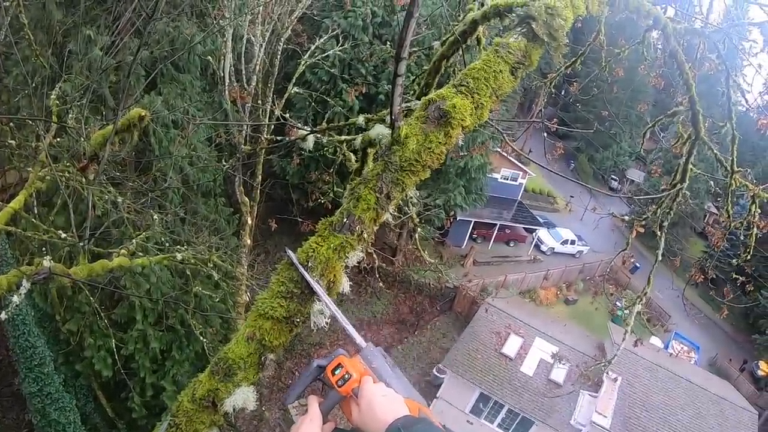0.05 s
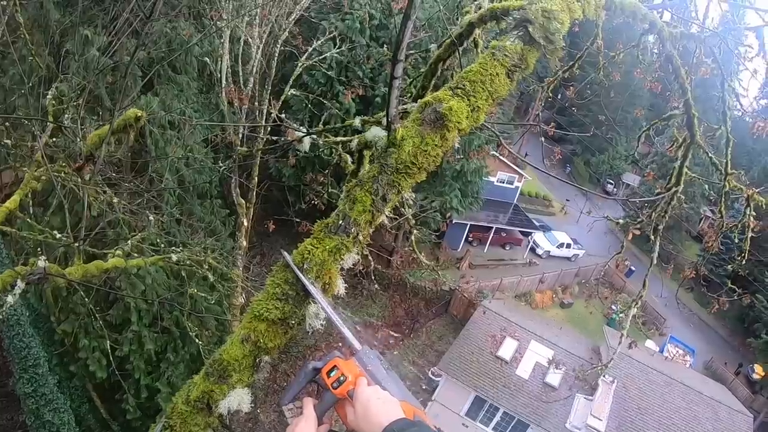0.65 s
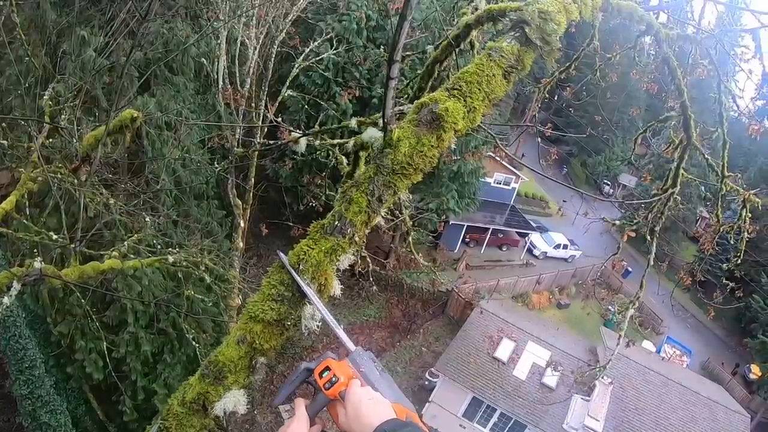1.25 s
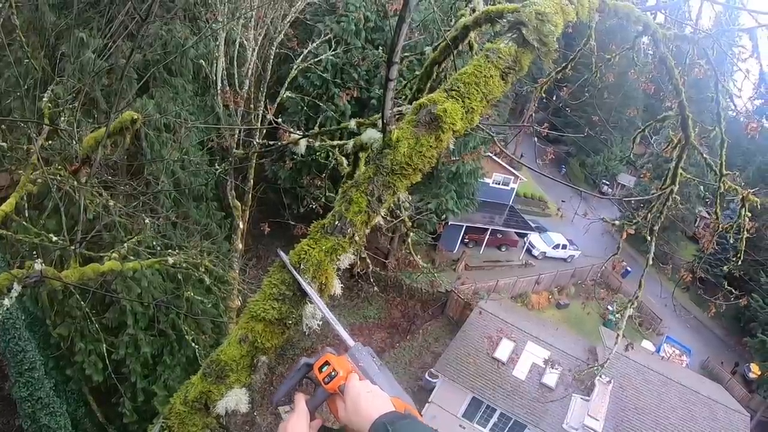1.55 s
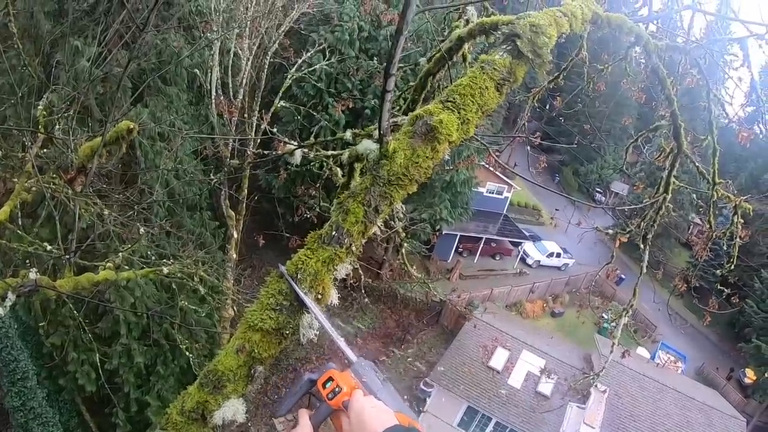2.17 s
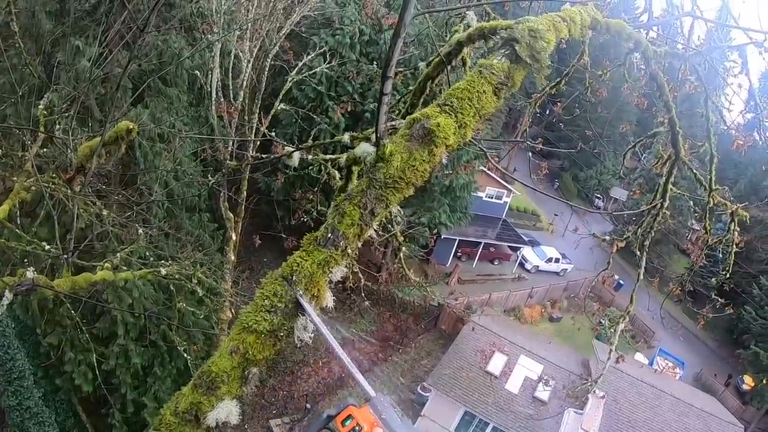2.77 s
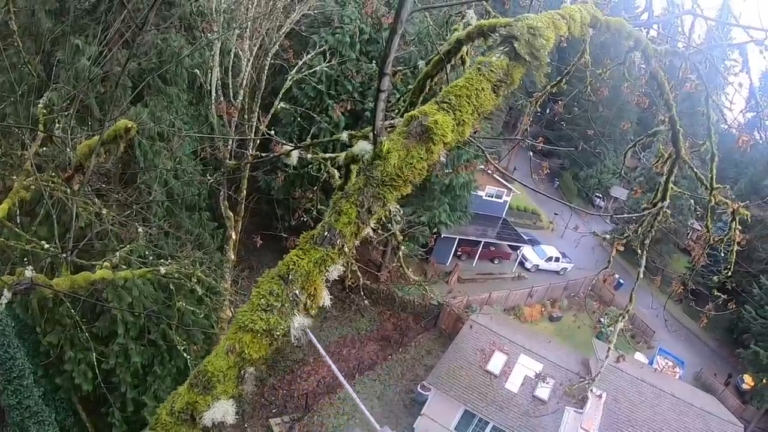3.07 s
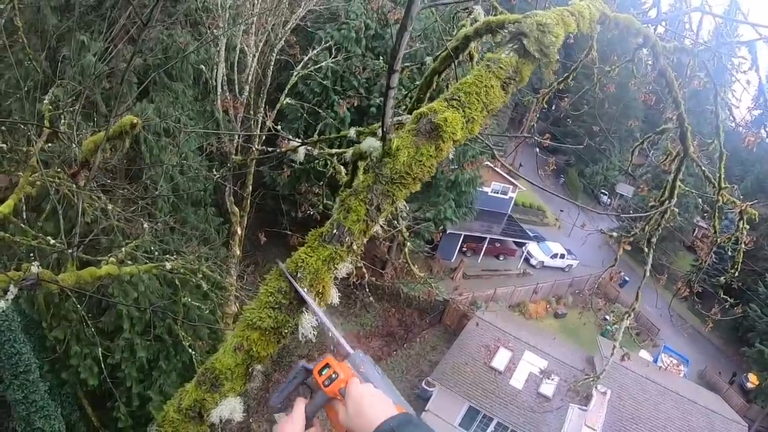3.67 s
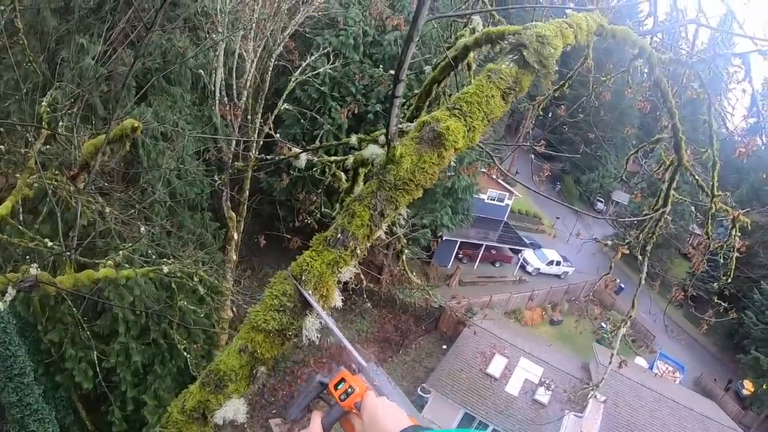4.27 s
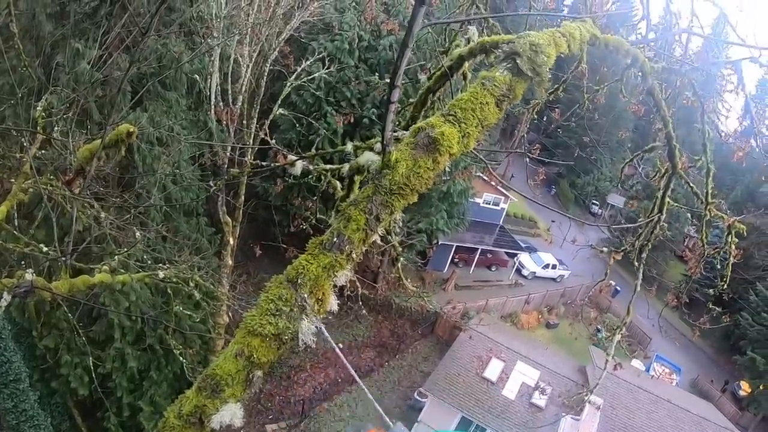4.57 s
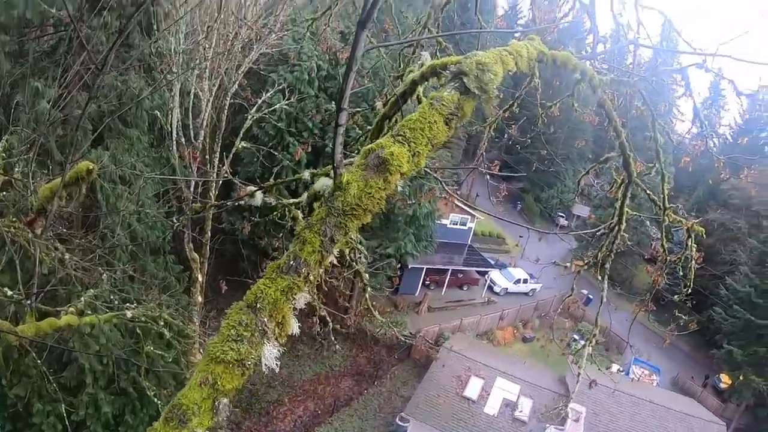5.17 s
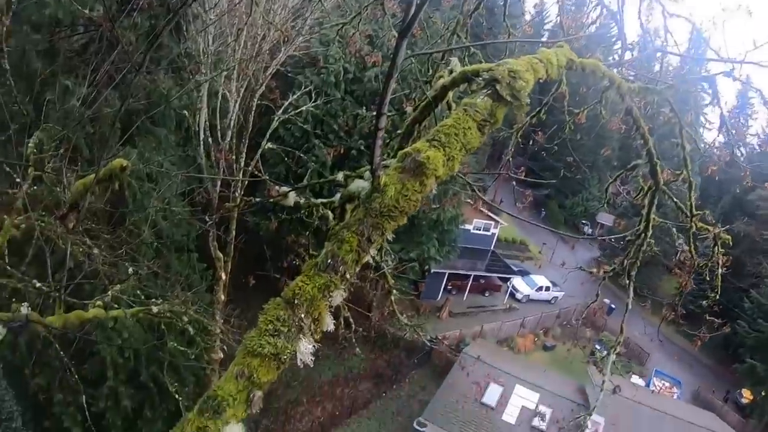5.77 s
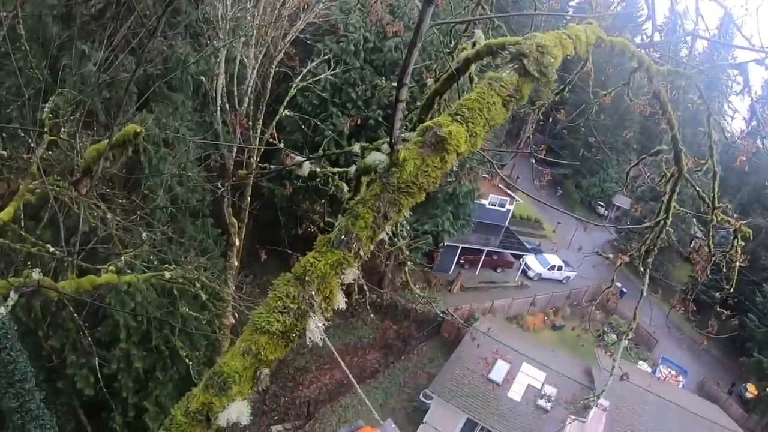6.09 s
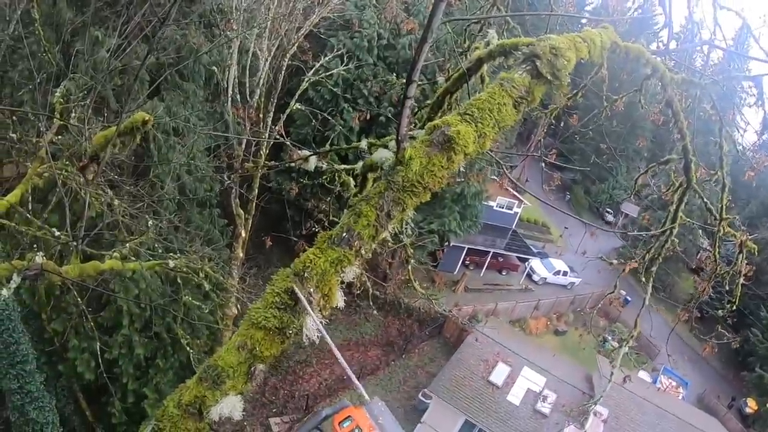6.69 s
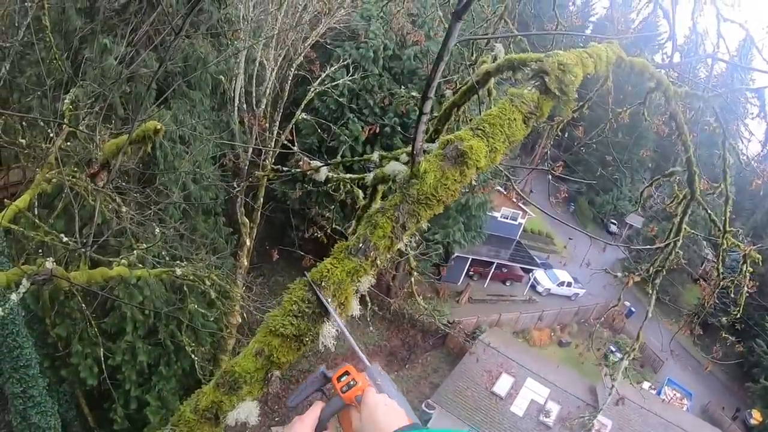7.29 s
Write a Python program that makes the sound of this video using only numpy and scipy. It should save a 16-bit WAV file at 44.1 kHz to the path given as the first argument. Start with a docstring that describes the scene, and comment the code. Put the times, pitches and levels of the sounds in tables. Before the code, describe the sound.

An electric chainsaw blips repeatedly against a tree branch, very near, its whine climbing and falling over a metallic chain rattle. Midway it halts with several sharp clicks and a light patter of debris, leaving a faint far engine hum, outdoor rumble and a thin rising whine in the distance. Near the end the saw starts again, snagging in the wood with dull knocks before revving in quick spurts.

```python
"""A battery chainsaw, close to the microphone, blipped again and again against a mossy branch high in a tree.
Its drive whines up and coasts down through the resonances of the plastic housing, while the chain
grinds in the wood and rattles round the steel bar. Between bursts the saw clicks and debris patters down.
Far off, an engine hums below and a thin whine climbs over low rumble and road noise."""
import sys
import numpy as np
from scipy import signal
from scipy.fft import rfft, irfft
from scipy.io import wavfile
from scipy.ndimage import uniform_filter1d, map_coordinates

SR = 44100
rng = np.random.default_rng(int(sys.argv[2]) if len(sys.argv) > 2 else 0)


def inscribe(sig):
    """Save sig as 16-bit PCM at rate SR to the path in sys.argv[1].

    A 1-D sig is mono; a 2-D sig holds one channel per row.
    Samples are clipped to [-1, 1] before scaling.
    """
    pcm = np.round(np.clip(np.atleast_2d(sig).T, -1, 1) * 32767)
    wavfile.write(sys.argv[1], SR, pcm.astype(np.int16))


N = 332514


def from_db(db):
    """Decibels to gain."""
    return 10 ** (np.asarray(db) / 20)


def rms_one(x):
    """Scale to unit rms."""
    return x / np.sqrt(np.mean(x ** 2) + 1e-20)


def in_time(rows):
    """Each column of a curve at every sample."""
    times, *columns = np.transpose(rows)
    return [np.interp(np.arange(N) / SR, times, column) for column in columns]


def per_bin(points):
    """A (f/Hz, value) table at every Fourier bin."""
    hz, value = np.transpose(points)
    return np.interp(np.log(np.arange(N // 2 + 1) * SR / N + 1e-3), np.log(hz), value)


def drift(rate_hz):
    """Smooth random wandering with a spread near 1."""
    knots = rng.standard_normal(N // 20)
    return map_coordinates(knots, [np.arange(N) * rate_hz / SR], order=2, mode="wrap")


def resonate(x, hz, width_hz):
    """One resonance with gain 1 at its peak."""
    r = np.exp(-np.pi * width_hz / SR)
    poles = [1, -2 * r * np.cos(2 * np.pi * hz / SR), r * r]
    return signal.lfilter(np.array([1, 0, -1]) * (1 - r * r) / 2, poles, x + 1e-18)


def ring(x, hz, t60):
    """A unit impulse starts a decaying sine of height 1."""
    r, w = from_db(-60 / (t60 * SR)), 2 * np.pi * hz / SR
    return signal.lfilter([0, np.sin(w)], [1, -2 * r * np.cos(w), r * r], x + 1e-18)


def impulses(events):
    """One impulse for each (t/s, level/dB) row."""
    times, db = np.transpose(events)
    return np.bincount(np.round(times * SR).astype(int), from_db(db), N)


def die_away(x, seconds):
    """Each impulse becomes an exponential decay."""
    return signal.lfilter([1], [1, -np.exp(-1 / (seconds * SR))], x + 1e-18)


# diffuse sound at the microphone pair: f/Hz, left-right correlation
MIC_LIKENESS = [(25, 0.31), (70, 1), (500, 0.9334), (1500, 0.28), (3000, 0.79), (6000, 1), (9000, 0.098),
                (14000, .6)]
def diffuse(spectrum):
    """Coloured noise that reaches the two microphones only partly alike."""
    mid, side = rfft(rng.standard_normal((2, N)))
    alike = np.clip(per_bin(MIC_LIKENESS), -1, 1)
    pair = np.sqrt(1 + alike) * mid + np.sqrt(1 - alike) * side * [[1], [-1]]
    return rms_one(irfft(pair * from_db(per_bin(spectrum)), N))


# the air around the tree: t/s, rumble level/dB, road level/dB, wash level/dB
AIR_LEVELS = [(0, -47.5, -49.5, -50.5), (1.0, -45, -64.5, -47), (2.4, -51, -54, -48),
              (3.5, -50, -56.5, -50.5), (4.6, -45, -49, -49.5), (5.3, -42, -43, -46.5),
              (5.9, -41.5, -44, -46), (6.5, -38.5, -39, -46.5), (7.0, -44.5, -36.5, -33.5),
              (7.54, -46.5, -46.5, -40)]
# spectra of those three layers: f/Hz, level/dB
RUMBLE_SPECTRUM = [(15, 0.5), (35, -2), (55, 2.5), (73, 5), (86, 1), (130, 6.5), (180, -3), (260, -13.5),
                   (400, -18.5), (800, -58.5)]
ROAD_SPECTRUM = [(60, -10.5), (130, -8.5), (190, -0.5), (290, -5), (420, -18), (800, -14.5), (2000, -50.5),
                 (5000, -80.5)]
WASH_SPECTRUM = [(100, -10.5), (250, -12.5), (450, -10.5), (800, -8.5), (1300, -12.5), (2000, -21.5),
                 (3000, -31.5), (5000, -49.5), (9000, -55), (12000, -81)]
def outdoors():
    """Low rumble, road noise and a far wash arrive from all around."""
    rumble, road, wash = from_db(in_time(AIR_LEVELS))
    return rumble * diffuse(RUMBLE_SPECTRUM) + road * diffuse(ROAD_SPECTRUM) + wash * diffuse(WASH_SPECTRUM)


# a faint whine far off: t/s, f/Hz, level/dB
FAR_WHINE_PATH = [(5.0, 1740, -79.5), (6.2, 1915, -67), (6.68, 2060, -60), (7.2, 2198, -76)]
def far_whine(waver_hz=8, flutter_db=3):
    """A thin, unsteady tone rises in the distance."""
    hz, level_db = in_time(FAR_WHINE_PATH)
    gain = from_db(level_db + flutter_db * drift(20))
    return gain * np.sin(2 * np.pi * np.cumsum(hz + waver_hz * drift(40)) / SR)


# firing rate of the engine far below: t/s, f/Hz
ENGINE_PITCH = [(0, 110.4), (.6, 117), (2.6, 116.6), (4.8, 115.3), (5.35, 113), (5.7, 103.8), (6.0, 81.46),
                (6.55, 89.02), (7.0, 97.04), (7.54, 97.9)]
# swell of its firing tone: t/s, level/dB
ENGINE_LEVEL = [(0, -56.5), (.13, -36), (.45, -40.5), (1.02, -40.5), (1.13, -34.5), (1.65, -34), (1.9, -33),
                (2.55, -28.5), (3.0, -33), (4.0, -36), (4.45, -40.5), (4.95, -40.5), (5.33, -34),
                (5.63, -34.5), (6.07, -52), (6.52, -32), (6.82, -57.5), (7.05, -31.5), (7.54, -41.5)]
def far_engine(octave_db=-28, drone_hz=73, drone_db=-52, scatter_db=-48):
    """Only the firing tone, a trace of its octave and a lower drone carry this far."""
    hz, = in_time(ENGINE_PITCH)
    level_db, = in_time(ENGINE_LEVEL)
    angle = 2 * np.pi * np.cumsum(hz + 0.39 * drift(21)) / SR
    firing = from_db(level_db - 0.68) * (np.sin(angle) + from_db(octave_db) * np.sin(2 * angle))
    # scattered paths make the tone fade in and out when it is weak
    scatter = from_db(scatter_db) * (drift(11) * np.sin(angle) + drift(11) * np.cos(angle))
    drone_gain = from_db(drone_db + 0.88 * drift(2.1))
    drone = drone_gain * np.sin(2 * np.pi * np.cumsum(drone_hz + 1.84 * drift(11)) / SR)
    return np.sqrt(2) * (firing + scatter + drone)


# handling and falling debris: t/s, level/dB
RUSTLE_LEVEL = [(0, -53), (.12, -60.5), (.21, -57.5), (.32, -76.5), (.47, -56), (1.0, -56.5), (1.8, -56),
                (2.5, -56), (3.35, -64), (3.6, -63.5), (4.56, -51), (4.95, -57.5), (5.35, -69), (6.1, -70),
                (6.24, -60.5), (6.35, -67.5), (6.75, -59)]
# leaves and branches nearby: f/Hz, level/dB
LEAF_SPECTRUM = [(1000, 1), (2500, 13), (4200, 5.5), (6500, 1), (8000, 2), (9300, -1.5), (11000, -32),
                 (15000, -34.5)]
def rustle(patter_db=2.0, gust_db=3.5):
    """Handling and falling debris make a fine, uneven patter close to the microphone."""
    level_db, = in_time(RUSTLE_LEVEL)
    patter = rms_one(from_db(patter_db * drift(500) + gust_db * drift(15)))
    return from_db(level_db) * patter * diffuse(LEAF_SPECTRUM)


# chain clicks and snapping twigs: t/s, level/dB
CLICK_HITS = [(.2145, -36), (.409, -44), (.4684, -27), (1.058, -34), (1.141, -25.5), (1.84, -33.5),
              (1.863, -30), (2.4968, -33.5), (2.5258, -31), (2.5477, -25), (4.4805, -16), (4.5135, -11),
              (4.642, -33.5), (4.743, -14), (4.762, -33), (4.806, -28.5), (4.8803, -17.5), (4.884, -9.5),
              (5.2715, -40.5), (5.4411, -39.5), (6.2488, -41), (6.398, -44), (6.6279, -45)]
# modes of a click: f/Hz, level/dB, t60/s
CLICK_RING = [(1279.7, -11.5, 0.00609), (1740, -14, 0.0145), (2060, -12, 0.0064), (3400, -11.5, 0.0064),
              (3950, -4, 0.00627), (4367, 1, 0.00156), (5750, -9.5, 0.00335), (7920, -9, 0.0032),
              (10000, -36, 0.0013)]
# steel links on the bar, also the colour of cracks and scrapes: f/Hz, level/dB
STEEL_SPECTRUM = [(900, -11.5), (1900, -5.5), (2600, 1), (3200, -0.5), (4400, -1), (5600, 0), (6400, -4.5),
                  (8100, -1.5), (9150, 0.5), (10200, -4.5), (11200, -15.5), (14500, -20.5), (15500, -40)]
def clicks(crack_db=-16, tail_db=-23):
    """A hard contact close by rings briefly and leaves a short scatter from the branches around."""
    hits = impulses(CLICK_HITS)
    body = sum((-1) ** k * from_db(db) * ring(hits, hz, t60) for k, (hz, db, t60) in enumerate(CLICK_RING))
    crack = from_db(crack_db) * die_away(hits, seconds=0.0003095) * diffuse(STEEL_SPECTRUM)
    tail = from_db(tail_db) * die_away(hits, seconds=0.00871) * diffuse(LEAF_SPECTRUM)
    return body + crack + tail


# ticks of the catch before a squeeze: t/s, level/dB
CATCH_TICKS = [(1.077, -32.5), (1.7755, -33.5), (1.7994, -38.5), (1.8234, -33.5)]
def trigger_catch(ring_hz=4500, width_hz=600, dull_db=-24):
    """The sprung catch scrapes and rings briefly when it is thumbed."""
    scrape = die_away(impulses(CATCH_TICKS), seconds=0.0054) * diffuse(STEEL_SPECTRUM)
    return resonate(scrape, ring_hz, width_hz) + from_db(dull_db) * scrape


# teeth catching in the branch: t/s, level/dB
SNAG_HITS = [(4.477, -22.5), (6.832, -26), (6.955, -19), (7.363, -15)]
# the knock of a snag: f/Hz, level/dB
KNOCK_SPECTRUM = [(100, -18), (250, -6), (520, 2), (800, -1), (1300, 0), (2000, -9), (5000, -15),
                  (12000, -32)]
def snags():
    """A snag jolts the whole saw with a dull knock."""
    return die_away(impulses(SNAG_HITS), seconds=0.0137) * diffuse(KNOCK_SPECTRUM)


def link_strikes(angle, spectrum, depth, uneven_db):
    """Links strike once every two mesh cycles, each with a strength of its own."""
    link = (angle / (4 * np.pi)).astype(int)
    strength = from_db(uneven_db * np.clip(rng.standard_normal(N // 20), -2, 2)[link])
    return diffuse(spectrum) * strength * (1 + depth * np.cos(angle / 2))


# modes of the steel bar: f/Hz, width/Hz, level/dB
BAR_MODES = [(2900, 80, -3), (3219, 80, -1), (3515, 70, -2), (3980, 100, -4), (4420, 120, -4),
             (5044, 100, -6), (6650, 80, -8), (7592, 60, -7), (9167, 80, -12)]
def chain_rattle(angle, bite, mesh_hz, full_speed_hz=1250):
    """The links set the bar ringing; the faster they run, the more they sizzle."""
    strikes = link_strikes(angle, STEEL_SPECTRUM, depth=0.18, uneven_db=0.2543 + 0.7 * bite)
    sizzle = (mesh_hz / full_speed_hz) ** 2 * resonate(strikes, hz=9200, width_hz=1000)
    ringing = sum(from_db(db) * resonate(strikes, hz, width) for hz, width, db in BAR_MODES)
    return rms_one(strikes + sizzle + ringing)


# modes of the plastic shell: f/Hz, width/Hz, level/dB
HOUSING_MODES = [(528.37, 60.2, 3.5), (736.2, 110, -5), (990.1, 54, -10.5), (1262.2, 151.7, 3),
                 (1555, 81, -5.5), (1900, 53, -13), (2106.6, 79, -5.5), (2273, 62, -11.5),
                 (3125, 640, -7.5), (4400, 550, -10.5)]
def housing(force, direct_db=-16, band_hz=(440, 5100)):
    """The shell rings in its modes; it is too small to radiate bass and muffles the top."""
    ringing = sum(from_db(db) * resonate(force, hz, width) for hz, width, db in HOUSING_MODES)
    radiation = signal.butter(8, band_hz, "band", fs=SR, output="sos")
    return signal.sosfilt(radiation, from_db(direct_db) * force + ringing)


# chain drag, before the housing colours it: f/Hz, level/dB
GRIND_SPECTRUM = [(150, -5.5), (330, -3.5), (500, -1), (800, 8.5), (1050, 9), (1300, 2), (1800, 4.5),
                  (2300, -23.5), (3200, -7), (6000, -31)]
def grinding(angle, bite):
    """The chain drags in bar and wood, rougher as it bites, and sounds through the housing."""
    return rms_one(housing(link_strikes(angle, GRIND_SPECTRUM, depth=0.13, uneven_db=1.5 + 1.8 * bite)))


# drive partials, the half multiples from the chain links: multiple of the mesh rate, level/dB
DRIVE_PARTIALS = [(.5, -12), (1, 0), (1.5, -13), (2, 1), (2.5, -14), (3, -7.5), (3.5, -14), (4, -6),
                  (4.5, -19), (5, -12), (5.08, -13), (6, -14), (7, -11), (7.5, -16), (8, -15), (8.5, -15),
                  (9, -14), (10, -16), (12, -17)]
def drive_whine(angle, bite, flutter_db=2.5, slack_rad=0.016, bite_rad=0.088, cycles_per_turn=12):
    """Drive partials sweep through the housing modes; biting teeth shake their phase."""
    shaken = angle + (slack_rad + bite_rad * bite) * drift(300)
    force = sum(from_db(db + flutter_db * drift(110)) * np.sin(multiple * shaken)
                for multiple, db in DRIVE_PARTIALS)
    tension = 1 + 0.1 * np.cos(angle / cycles_per_turn)  # the chain tightens once per sprocket turn
    return housing(np.sqrt(2) * force * tension)


# trigger squeezes: pull t/s, release t/s, stall t/s, ungoverned top mesh f/Hz,
# friction/(Hz/s), drag/(Hz/s per Hz squared), drive level/dB, chain level/dB
TRIGGER_SQUEEZES = [(0.476, .657, .93, 1280, 3634, 0.001458, -0.5, 1),
                    (1.126, 1.329, 1.635, 1340, 2899, 0.001099, -.5, 0),
                    (1.846, 2.061, 2.3, 1450, 3950, 0.002082, -0.5, -.5),
                    (2.535, 2.771, 3.29, 1583, 1253, 0.002867, -0.5, 0.5),
                    (3.622, 3.782, 4.52, 1049, 1383, 0.00174, 1, 0),
                    (4.014, 4.057, 4.52, 822, 198, .0076, -0.5, -1),
                    (4.22, 4.309, 4.52, 1168, 3600, .0023, -1, -1),
                    (6.8, 6.832, 7.6, 288.3, 80.18, .0064, 5.5, 3.5),
                    (6.965, 6.986, 7.6, 199.5, 20, .005, 3, 1.5),
                    (7.144, 7.262, 7.6, 1032, 3850, 0.000098, 0, 1),
                    (7.378, 7.419, 7.6, 590.9, 2750, .0001, 0, -1),
                    (7.487, 7.544, 7.6, 866, 3040, .002, -0.5, -1)]
def motor(governed_hz=1507.8, stall_db_per_s=499.5):
    """A squeeze speeds it up evenly; let go, it coasts against friction and drag until the chain stalls."""
    t = np.arange(N) / SR
    mesh_hz, powered, level_db = np.zeros(N), np.zeros(N), np.zeros((2, N))
    for pull, release, stall, top_hz, friction, drag, drive_db, chain_db in TRIGGER_SQUEEZES:
        since_pull, held = t >= pull, t < release
        rise = np.interp(t, [pull, release], [np.interp(pull, t, mesh_hz), top_hz])
        even_hz = np.sqrt(friction / drag)  # at this speed drag and friction brake alike
        braked = drag * even_hz * np.maximum(t - release, 0)
        coast = even_hz * np.tan(np.maximum(np.arctan(top_hz / even_hz) - braked, 0))
        stalled_db = stall_db_per_s * np.clip(t - stall, 0, .5)
        mesh_hz = np.where(since_pull, np.where(held, rise, coast), mesh_hz)
        powered = np.where(since_pull, held, powered)
        level_db = np.where(since_pull, [drive_db - stalled_db, chain_db - stalled_db], level_db)
    gains = uniform_filter1d(from_db(level_db), size=300)
    return np.minimum(mesh_hz, governed_hz), uniform_filter1d(powered, size=800), gains


# the teeth in the wood: t/s, bite from 0 to 1
BITE_DEPTH = [(0, 0.4), (3.5, 0), (3.7, 0.3), (4.2, 0.7), (4.5, .8), (6.96, 0.88), (7.0, 0.5), (7.16, 1),
              (7.54, 0.2)]
# harder work is louder: unloaded mesh f/Hz, whine level/dB, grinding level/dB, rattle level/dB
WORK_LEVELS = [(0, -77, -63.5, -80.5), (111, -56.5, -48.5, -56), (200.5, -44, -37.5, -43),
               (306.9, -35, -36, -37.5), (408, -31, -33, -32.5), (556, -23, -30.5, -30),
               (860, -22, -32, -26), (1390, -20.5, -32, -24.5)]
def chainsaw(bite_load=0.34, bite_waver=0.01, taut_grind_db=2.5, taut_chain_db=2.17, chatter_db=1.0):
    """Whine, grinding and rattle follow one motor, which works harder and wavers as the teeth bite."""
    mesh_hz, powered, (drive_gain, chain_gain) = motor()
    bite, = in_time(BITE_DEPTH)
    work_hz = mesh_hz * (1 + bite_load * bite)
    unloaded_hz, *levels = np.transpose(WORK_LEVELS)
    whine_db, grind_db, chain_db = (np.interp(work_hz, unloaded_hz, db) for db in levels)
    angle = 2 * np.pi * np.cumsum(mesh_hz * (1 + bite_waver * bite * drift(90))) / SR
    whine = from_db(whine_db) * drive_whine(angle, bite)
    # the chain is pulled taut, and louder, while the trigger is held
    grind = from_db(grind_db + taut_grind_db * powered) * grinding(angle, bite)
    chain_db = chain_db + taut_chain_db * powered + chatter_db * drift(70)
    rattle = from_db(chain_db) * chain_rattle(angle, bite, mesh_hz)
    return drive_gain * (whine + grind) + chain_gain * rattle + snags()


# the saw at the microphone pair: f/Hz, left minus right level/dB
SAW_BALANCE = [(400, 1), (740, 0.5), (1220, -4.5), (2010, -4), (3330, -2), (5300, -0.5), (7000, 6),
               (9080, -4.5), (15000, -4.5)]
def scene():
    """Up in the tree: the saw is close and a little to the right; the rest lies all around."""
    balance = from_db(per_bin(SAW_BALANCE) * [[.5], [-.5]])
    near = irfft(rfft(chainsaw() + clicks() + trigger_catch()) * balance, N)
    return near + far_engine() + far_whine() + outdoors() + rustle()


def limit(pair, ceiling_db=-16.0):
    """Gain control turns down the moments when the whine swells on a resonance."""
    power = uniform_filter1d(np.mean(pair ** 2, axis=0), size=300)
    return pair / (1 + (power / from_db(ceiling_db) ** 2) ** 4) ** (1 / 8)


def record(dry, port_hz=7900, port_width_hz=600, cutoff_hz=15300):
    """The right microphone port turns the phase at its resonance; peaks are held down, the top is cut."""
    r = np.exp(-np.pi * port_width_hz / SR)
    poles = [1, -2 * r * np.cos(2 * np.pi * port_hz / SR), r * r]
    right = signal.lfilter(poles[::-1], poles, dry[1])  # all-pass
    pair = limit(np.array([dry[0], right]))
    return signal.sosfilt(signal.ellip(12, .1, 80, cutoff_hz, fs=SR, output="sos"), pair)


dry = scene()
out = record(dry)
inscribe(out)
```